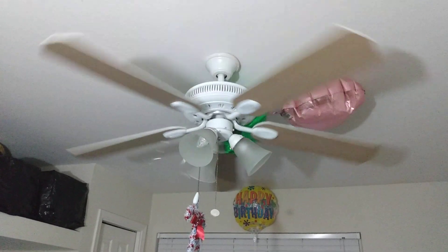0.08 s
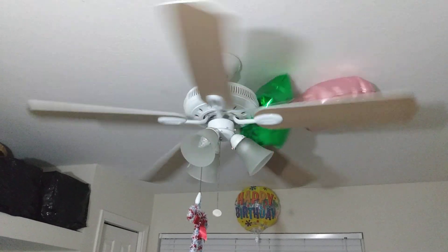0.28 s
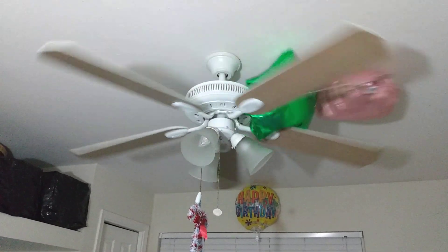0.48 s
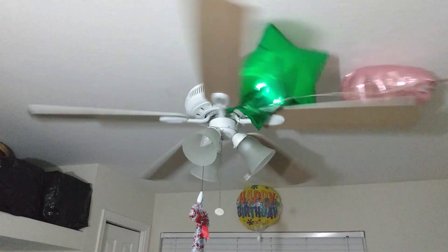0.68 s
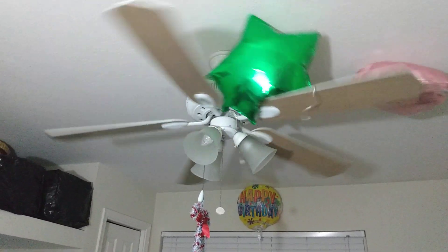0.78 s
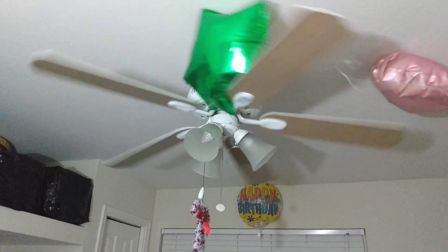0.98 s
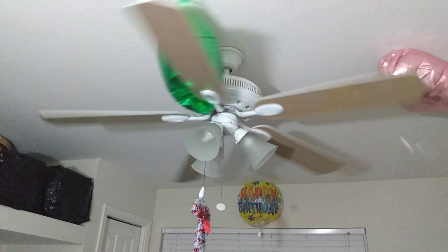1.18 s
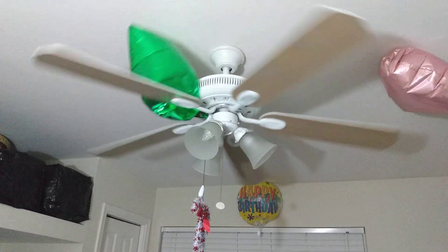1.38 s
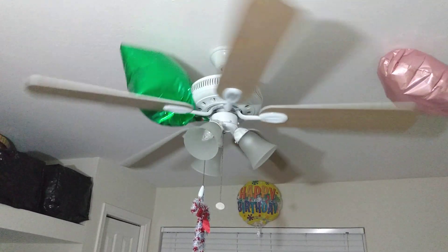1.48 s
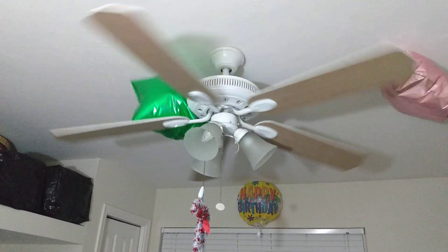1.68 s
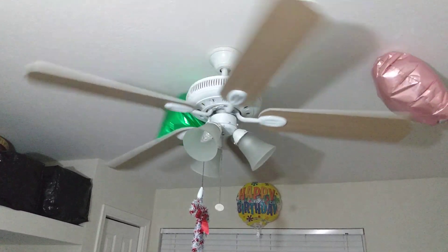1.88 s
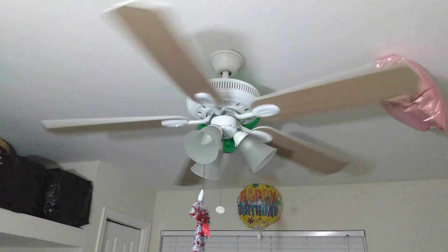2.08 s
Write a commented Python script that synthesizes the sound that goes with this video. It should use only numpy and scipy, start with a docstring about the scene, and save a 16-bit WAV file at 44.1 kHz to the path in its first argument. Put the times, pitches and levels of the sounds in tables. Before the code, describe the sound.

A foil balloon rustles very faintly, mostly to the right, over a quiet ceiling fan drone, with tiny early snaps. At about 0.2 s a blade catches it: sharp snaps, dense bright crinkling, rubbing and hollow bumps, strongest near 0.5-0.6 s, another crisp snap at 0.75 s. Crackling thins after 1.1 s and is gone by 1.4 s; small ticks at 1.65 and 1.97 s, with low wavering fan hum swelling around 1.7 and 2.0 s.

```python
"""A ceiling fan drones in a small room and a foil balloon rustles faintly, mostly to the right, throughout.
After a few early snaps a blade catches the balloon: clustered grains make the crinkle of the foil,
short noise bursts its snaps, filtered grains the rub of the skin, and noise and decaying sines the
boom of the gas inside. As this dies away, two small ticks sound and the fan's low drone of coloured
noise is joined by a wavering sine hum."""
import sys
import numpy as np
from scipy import signal
from scipy.fft import rfft, irfft
from scipy.io import wavfile

SR = 44100
rng = np.random.default_rng(int(sys.argv[2]) if len(sys.argv) > 2 else 0)


def file_out(sig):
    """Save sig as 16-bit WAV at sys.argv[1]."""
    # one column per channel
    cols = np.atleast_2d(sig).T
    # limit, then scale
    lim = np.clip(cols, -1, 1)
    pcm = np.round(lim * 32767).astype(np.int16)
    wavfile.write(sys.argv[1], SR, pcm)


N = 92610
TIME = np.arange(N) / SR  # s
FREQ = np.arange(N // 2 + 1) * SR / N  # Hz
SIDES = np.array([[1], [-1]])  # left, right

# Level curves [t/s, level/dB]; HOLLOWS later dips the fan, rustle and balloon layers
# drone of the fan
DRONE_LEVEL = [(0, -71), (.14, -70.5), (.185, -78.5), (.9, -74.5), (1.35, -71), (1.54, -77.5),
               (1.63, -70.5), (1.675, -70.5), (1.775, -64.5), (1.85, -73.5), (1.885, -74), (1.95, -76.5),
               (2.0, -73.5), (2.045, -66.5), (2.1, -77)]
# swish of the blades
SWISH_LEVEL = [(0, -85.5), (1.37, -79.5), (1.42, -70.5), (1.53, -73.5), (1.64, -83), (1.72, -93),
               (1.85, -99), (1.92, -87.5), (1.97, -85), (2.03, -79.5), (2.1, -86)]
# rustle of the drifting foil
RUSTLE_LEVEL = [(0, -59), (.19, -61.5), (1.2, -55.5), (1.36, -62), (1.5, -65.5), (1.63, -67.5),
                (1.72, -66.5), (1.85, -70.5), (1.91, -67.5), (1.96, -72), (2.04, -63.5), (2.1, -64)]
# soft brushing of the drifting balloon against the fan
BRUSH_LEVEL = [(0, -71.5), (.07, -80.5), (.136, -72), (.2, -79), (1.2, -72), (1.36, -74.5), (1.5, -80),
               (1.62, -81.5), (1.66, -76.5), (1.78, -74.5), (1.858, -88), (2.0, -86), (2.028, -70.5),
               (2.1, -71.5)]
# crinkle, set by how hard the foil is crumpled
CRUMPLE_LEVEL = [(.18, -100), (.208, -56), (.225, -57), (.233, -58), (.265, -43), (.29, -47), (.38, -47),
                 (.42, -45.5), (.465, -42.5), (.51, -38), (.553, -34.5), (.59, -35.5), (.64, -43),
                 (.69, -48), (.755, -45), (.87, -46), (1.0, -47.5), (1.08, -46.5), (1.17, -54.5),
                 (1.28, -67.5), (1.42, -110), (1.7, -100)]
# blade rubbing over the skin
RUB_LEVEL = [(.205, -105), (.212, -73), (.226, -66), (.245, -52.5), (.27, -54), (.36, -56.5), (.41, -51),
             (.45, -51.5), (.50, -47), (.585, -48.5), (.635, -49), (.69, -54.5), (.77, -51), (.92, -53.5),
             (1.06, -54.5), (1.17, -56), (1.33, -67), (1.42, -76.5), (1.52, -87.5), (1.7, -105)]
# body of the balloon being pushed about
PUSH_LEVEL = [(.212, -104), (.235, -66), (.30, -62.5), (.38, -73), (.44, -70), (.50, -55.5), (.56, -62),
              (.605, -58), (.658, -62), (.70, -63), (.78, -66), (.87, -61.5), (.96, -79), (1.07, -80),
              (1.18, -68.5), (1.33, -86), (1.5, -106)]
# low bass as the whole balloon sways
SWAY_LEVEL = [(.2, -105), (.25, -96), (.342, -88), (.38, -86), (.44, -71), (.54, -66.5), (.608, -58.5),
              (.658, -77), (.716, -79), (.79, -85), (.96, -89), (1.09, -100), (1.4, -115)]

# Relative spectra [f/Hz, level/dB]
# drone of the fan
FAN_SPECTRUM = [(25, -59), (65, -33), (150, -36), (220, -25), (270, -12.5), (310, -2), (340, -4.5),
                (362, -3), (392, -3), (470, -8.5), (540, -16.5), (620, -36), (750, -35.5), (840, -23),
                (960, -40), (2000, -37), (6000, -57)]
# air noise of the blades
BLADE_AIR_SPECTRUM = [(500, -40), (1000, -16), (1250, -19), (1380, 0), (1500, 1.5), (1680, -24),
                      (2050, -12.5), (2700, -17.5), (4000, -36)]
# loose foil stirring
LOOSE_FOIL_SPECTRUM = [(1000, -53), (2700, -25), (3400, -22.5), (4200, -16.5), (5000, -14), (6300, -15.5),
                       (7100, -11.5), (8900, -5.5), (10500, -4), (12500, -12.5), (15500, -12)]
# balloon brushing the fan
BRUSH_SPECTRUM = [(500, -22.5), (750, -34), (1100, -2.5), (1650, -11), (1950, 3.5), (2170, 1), (2370, 3.5),
                  (2520, -2), (2700, 2), (3050, -9.5), (3450, -10), (3700, 2), (3950, -7), (4220, 6.5),
                  (4650, -4.5), (5000, 0.5), (5450, -4), (6100, -18), (6700, -1), (9000, -27.5),
                  (15000, -27)]
# snapping creases
SNAP_SPECTRUM = [(1500, -43), (4000, -9), (6500, -5.5), (8500, 2), (10000, 2), (12000, -6.5), (15500, -10)]
# crumpled foil
FOIL_SPECTRUM = [(1200, -26), (2500, -10), (3150, -10.5), (3650, -6), (4100, -4.5), (4800, -6.5),
                 (6100, -6.5), (7400, -2), (8650, -1), (10200, -0.5), (12000, -3.5), (15500, -8)]
# rubbed skin
SKIN_SPECTRUM = [(50, -38), (120, -31), (200, -7), (295, -2), (420, -2), (630, -4.5), (760, -3.5),
                 (870, -3), (1020, -3.5), (1270, -5), (1500, -4), (1750, -6.5), (2400, -5.5), (2850, -12),
                 (3400, -14), (3900, -14), (6000, -10), (15000, -26)]
# body of the balloon
BODY_SPECTRUM = [(50, -30), (100, -13.5), (140, -7.5), (210, 1.5), (320, -6.5), (800, -61)]
# swaying of the whole balloon
SWAY_SPECTRUM = [(25, -28), (45, -17), (60, -16), (82, 6), (105, 7), (150, -34), (400, -70)]
# short scrape of the blade
GRAZE_SPECTRUM = [(150, -25), (300, 3.5), (650, 4.5), (1100, -19), (1500, -2), (1850, -11), (2350, 7.5),
                  (3300, -34), (4200, -5), (4800, -17), (5500, -12), (6500, -17), (15000, -28)]
# juddering skin under the hardest shove
SHOVE_SPECTRUM = [(60, -48), (150, -2), (230, -15), (350, 4.5), (480, 0.5), (630, 5), (750, -2),
                  (860, 10.5), (1000, -15), (1500, 0), (1800, -8), (5000, -48)]

# Stereo
# likeness of left and right [f/Hz, correlation]
LIKENESS = [(30, .82), (65, .92), (150, .95), (300, .9), (480, .7), (750, .25), (1500, .08), (4000, 0),
            (15000, 0)]
# balance of the nearer sounds [f/Hz, left minus right level/dB]
NEAR_BALANCE = [(100, 0), (300, .4), (700, .3), (1200, 0), (3000, 0), (5500, -3.6), (9000, -6.5),
                (15000, -2.2)]
# balance of rustle and swish, right in the treble [f/Hz, left minus right level/dB]
FAR_BALANCE = [(300, 31), (1500, -8), (4000, -5), (8000, -25.5), (15000, -9.5)]

# Events
# creases snapping over [t/s, level/dB before SNAP_DB and colouring, left minus right level/dB, decay/s]
SNAPS = [(.0438, -49, 8, .002), (0.1304, -43, -8, 0.0054), (.179, -53, -14, .002),
         (.2085, -45, -16, 0.0022), (0.2274, -29.5, -16, 0.0035), (0.235, -21.5, 0, 0.0026),
         (0.245, -20, -10, 0.0013), (.2486, -17, 1, 0.00059), (0.3, -29.5, -10, 0.0033),
         (0.472, -38, 1, .002), (.4983, -36, -8, .002), (0.508, -18, -2, 0.0025), (0.548, -21, 3, .003),
         (0.738, -23, -8, .003), (0.7511, -16, 0, 0.00086), (1.6527, -58, -28, 0.0034)]
# blade bumping the balloon, pitched by its squeeze [t/s, level/dB before BUMP_DB and fade, nominal f/Hz]
BUMPS = [(.207, -54.5, 334), (.258, -51, 356), (.451, -47.5, 493), (0.486, -53, 154), (.574, -40, 367.3),
         (.594, -46.5, 236), (.712, -50, 136), (.85, -57, 203), (.929, -51.5, 304), (1.035, -57, 376)]
# modes of the gas-filled skin [multiple of nominal f, level/dB]
BUMP_MODES = [(0.999, 0), (1.6, -22), (2.3, -17.5)]
# first graze of the blade (start t/s, end t/s, level/dB before HOLLOWS)
GRAZE = (0.209, 0.236, -60)
# taut panels of foil rasping [start t/s, end t/s, level/dB, f/Hz, half-width/Hz]
RASPS = [(0.28, .43, -62, 2620, 219), (0.48, 0.575, -55, 4270, 260), (.535, 0.58, -46, 8500, 700),
         (0.873, 1.19, -65.5, 1260, 170)]
# hardest shove of the blade (start t/s, end t/s, level/dB)
SHOVE = (0.57, 0.591, -46)
# small pitched ticks [t/s, level/dB before TICK_DB and fade, f/Hz, left minus right level/dB]
TICKS = [(1.648, -70, 3720, -3), (1.969, -57.5, 8060, -24)]
# hum joining the drone as the blades pass [start t/s, end t/s, nominal level/dB]
HUMS = [(1.668, 1.76, -65.5), (2.037, 2.032, -63.5)]
# fixed narrow dips filtered into the fan, rustle, balloon and graze layers [f/Hz, width/Hz, level/dB]
HOLLOWS = [(3064, 72, -5.5), (3450, 77, -17), (3900, 70, -5), (4800, 130, -3), (6280, 190, -1.5)]

# Settings; the spread scatters the grain levels exponentially
RUSTLES_PER_S, RUSTLE_SPREAD_DB = 4900, -0.5
CREASES_PER_S, CREASE_SPREAD_DB = 6000, -0.5
SLIPS_PER_S, SLIP_SPREAD_DB = 2200, 2
BRUSH_PATCHY_DB, BRUSH_PATCHY_HZ = 1.8, 18
CRINKLE_PATCHY_DB, CRINKLE_PATCHY_HZ = 1.5, 57
FLUTTER_DB, FLUTTER_HZ = -0.5, 78
ROOM_T60_S, ROOM_DB = 0.25, 1
SNAP_DB, SNAP_ROOM_DB = -6.5, -0.5
CAVITY_HZ, CAVITY_HALF_WIDTH_HZ, CAVITY_DB = 295, 26, -12.5  # level relative to RUB_LEVEL
BUMP_RISE_S, BUMP_DECAY_S, BUMP_DB, BUMP_ROOM_DB = 0.0035, 0.016, 2.5, -10.5
BUMP_LOW_CUT_HZ = 115
GRAZE_RISE_DB_PER_S, GRAZE_FALL_DB_PER_S = 2500, 600
RASP_RISE_DB_PER_S, RASP_FALL_DB_PER_S = 250, 81
SHOVE_RISE_DB_PER_S, SHOVE_FALL_DB_PER_S = 146, 262
TICK_RISE_S, TICK_DECAY_S, TICK_WIDTH_HZ, TICK_DB = 0.0022, 0.019, 550, -3.5
HUM_HZ, HUM_WANDER_HZ = 363, 8.95
HUM_RISE_DB_PER_S, HUM_FALL_DB_PER_S = 504, 158
CUTOFF_HZ = 15850


def from_db(db):
    """Logarithmic level: decibels to amplitude ratio."""
    return 10 ** (np.asarray(db) / 20)


def level(curve):
    """Amplitude envelope: gain interpolated in decibels over time."""
    return from_db(np.interp(TIME, *np.transpose(curve)))


def swell(start, end, db, rise_db_per_s, fall_db_per_s):
    """Exponential growth and decay: straight decibel slopes before start and after end."""
    before = np.maximum(start - TIME, 0)
    after = np.maximum(TIME - end, 0)
    return from_db(db - rise_db_per_s * before - fall_db_per_s * after)


def strike(start, rise_s, decay_s):
    """Struck resonance: a quick build-up followed by exponential decay."""
    age = np.maximum(TIME - start, 0)
    return (1 - np.exp(-age / rise_s)) * np.exp(-age / decay_s)


def wander(cutoff_hz):
    """Low-pass noise: a smooth random curve of standard deviation 1."""
    low_pass = signal.butter(2, np.clip(cutoff_hz, 2, 2000), fs=SR, output="sos")
    slow = signal.sosfilt(low_pass, rng.standard_normal(2 * N))[N:]  # skip the settling
    return slow / slow.std()


def noise_pair():
    """Statistical independence: unrelated white noise at the two ears."""
    return rng.standard_normal((2, N))


def at_bins(points):
    """Logarithmic frequency scale: a table read at every frequency bin."""
    hz, value = np.transpose(points)
    return np.interp(np.log(FREQ + 1), np.log(hz), value)


def unit(pair):
    """Normalisation: scale a pair so that its mid signal has rms 1."""
    return pair / np.sqrt(np.mean(pair.mean(0) ** 2) + 1e-20)


def place(pair, spectrum, balance):
    """Interaural correlation: colour two signals, blend them by band and set their balance."""
    a, b = rfft(pair) * from_db(at_bins(spectrum))
    alike = np.clip(at_bins(LIKENESS), -1, 1)
    common = np.sqrt(1 + alike) * (a + b)
    opposed = np.sqrt(1 - alike) * (a - b)
    lean = from_db(SIDES * at_bins(balance) / 2)
    return irfft((common + SIDES * opposed) / 2 * lean, N)


def room(pair, wet_db):
    """Reverberation: dense, dying reflections of ceiling and walls, different at each ear."""
    t = TIME[:N // 4]
    tail = rng.standard_normal((2, len(t))) * from_db(-60 * t / ROOM_T60_S)
    tail /= np.sqrt(np.sum(tail ** 2, axis=1, keepdims=True))
    return pair + from_db(wet_db) * signal.fftconvolve(pair, tail, axes=1)[:, :N]


def grains(per_s, spread_db):
    """Shot noise: one-sample clicks at random times and of random size, heard in the room."""
    born = rng.random(N) < per_s / SR
    sizes = from_db(spread_db * np.minimum(rng.exponential(1, N), 4))
    clicks = born * sizes * rng.uniform(-1.224, 1, (2, N))
    return room(clicks, ROOM_DB)


def patchy(pair, depth_db, cutoff_hz, count=14):
    """Independent modulation: overlapping bands flicker separately, so the colour keeps changing."""
    centres, spectrum, out = np.geomspace(700, 15000, count), rfft(pair), 0
    for share in np.eye(count):
        weight = at_bins(np.column_stack([centres, share]))
        band = irfft(spectrum * weight, N)
        out = out + band * from_db(depth_db * wander(cutoff_hz))
    return out


def hollowed(pair):
    """Band rejection: fixed narrow dips leave a sound banded and hollow."""
    dips = sum(db * np.exp(-((FREQ - centre_hz) / width_hz) ** 2) for centre_hz, width_hz, db in HOLLOWS)
    return irfft(rfft(pair) * from_db(dips), N)


def fan():
    """Aerodynamic noise: coloured noise gives a hollow drone and the thin swish of the blades."""
    drone = level(DRONE_LEVEL) * unit(place(noise_pair(), FAN_SPECTRUM, NEAR_BALANCE))
    swish = level(SWISH_LEVEL) * unit(place(noise_pair(), BLADE_AIR_SPECTRUM, FAR_BALANCE))
    return drone + swish


def rustle():
    """Superposed impulses: foil stirs in the draught and brushes lightly, mostly to the right."""
    stirs = grains(RUSTLES_PER_S, RUSTLE_SPREAD_DB)
    stir = level(RUSTLE_LEVEL) * unit(place(stirs, LOOSE_FOIL_SPECTRUM, FAR_BALANCE))
    touches = patchy(grains(per_s=2500, spread_db=-0.3), BRUSH_PATCHY_DB, BRUSH_PATCHY_HZ)
    brush = level(BRUSH_LEVEL) * unit(place(touches, BRUSH_SPECTRUM, FAR_BALANCE))
    return stir + brush


def snaps():
    """Snap-through buckling: large creases give way in bright, decaying noise bursts."""
    force = np.zeros((2, N))
    for start, db, pan_db, decay_s in SNAPS:
        age = TIME - start
        fade = (age >= 0) * np.exp(-np.abs(age) / decay_s)
        force += from_db(db + SNAP_DB + SIDES * pan_db / 2) * fade
    noise = rng.uniform(-0.82, 1, (2, N)) * np.sqrt(3)
    bursts = room(force * noise, SNAP_ROOM_DB)
    return irfft(rfft(bursts) * from_db(at_bins(SNAP_SPECTRUM)), N)


def crinkle():
    """Crackling noise: thousands of small creases flip while the blade crumples the foil."""
    flutter = from_db(FLUTTER_DB * wander(FLUTTER_HZ))
    flips = grains(CREASES_PER_S, CREASE_SPREAD_DB)
    creases = patchy(flips, CRINKLE_PATCHY_DB, CRINKLE_PATCHY_HZ)
    return level(CRUMPLE_LEVEL) * unit(flutter * place(creases, FOIL_SPECTRUM, NEAR_BALANCE))


def balloon():
    """Stick-slip friction: the skin rubs in grains; noise gives the boom and sway of the body."""
    slips = patchy(grains(SLIPS_PER_S, SLIP_SPREAD_DB), depth_db=1.5, cutoff_hz=53)
    skin = level(RUB_LEVEL) * unit(place(slips, SKIN_SPECTRUM, NEAR_BALANCE))
    body = level(PUSH_LEVEL) * unit(place(noise_pair(), BODY_SPECTRUM, NEAR_BALANCE))
    sway = level(SWAY_LEVEL) * unit(place(noise_pair(), SWAY_SPECTRUM, NEAR_BALANCE))
    return skin + body + sway


def cavity():
    """Cavity resonance: the gas sings as narrow-band noise whose level follows the rub."""
    resonance = 1 / (1 + ((FREQ - CAVITY_HZ) / CAVITY_HALF_WIDTH_HZ) ** 2)
    ring = irfft(rfft(rng.standard_normal(N)) * resonance, N)
    return level(RUB_LEVEL) * from_db(CAVITY_DB) * unit(np.array([ring, ring]))


def bumps():
    """Modal vibration: the blade's soft knocks ring the gas-filled body in decaying sines."""
    out = np.zeros(N)
    for start, db, pitch_hz in BUMPS:
        age = np.maximum(TIME - start, 0)
        fade = strike(start, BUMP_RISE_S, BUMP_DECAY_S)
        for ratio, mode_db in BUMP_MODES:
            mode = np.sin(2 * np.pi * pitch_hz * ratio * age)
            out += from_db(db + mode_db + BUMP_DB) * fade * mode
    high_pass = signal.butter(2, BUMP_LOW_CUT_HZ, "high", fs=SR, output="sos")
    out = signal.sosfilt(high_pass, out)
    return room(np.array([out, out]), BUMP_ROOM_DB)


def graze():
    """Sliding friction: the blade first scrapes the skin in a short run of coloured grains."""
    gain = swell(*GRAZE, GRAZE_RISE_DB_PER_S, GRAZE_FALL_DB_PER_S)
    slips = grains(SLIPS_PER_S, SLIP_SPREAD_DB)
    return gain * unit(place(slips, GRAZE_SPECTRUM, NEAR_BALANCE))


def rasps():
    """Forced resonance: as the balloon rolls, the slipping blade sets taut panels ringing."""
    out = 0
    for start, end, db, pitch_hz, half_width_hz in RASPS:
        slips = place(grains(per_s=1500, spread_db=1.4), SKIN_SPECTRUM, NEAR_BALANCE)
        resonance = 1 / (1 + ((FREQ - pitch_hz) / half_width_hz) ** 2)
        ring = irfft(rfft(slips) * resonance, N)
        out = out + swell(start, end, db, RASP_RISE_DB_PER_S, RASP_FALL_DB_PER_S) * unit(ring)
    return out


def shove():
    """Frictional judder: sparse grains make a hollow rumble where the blade pushes hardest."""
    gain = swell(*SHOVE, SHOVE_RISE_DB_PER_S, SHOVE_FALL_DB_PER_S)
    return gain * unit(place(grains(per_s=680, spread_db=3.5), SHOVE_SPECTRUM, NEAR_BALANCE))


def ticks():
    """Damped resonance: tight little creases ring briefly as narrow-band noise."""
    out = np.zeros((2, N))
    for start, db, pitch_hz, pan_db in TICKS:
        resonance = 1 / (1 + ((FREQ - pitch_hz) / TICK_WIDTH_HZ) ** 2) ** 2
        ring = irfft(rfft(noise_pair()) * resonance, N)
        fade = strike(start, TICK_RISE_S, TICK_DECAY_S)
        out += from_db(db + TICK_DB) * fade * unit(ring * from_db(SIDES * pan_db / 2))
    return out


def hum():
    """Frequency modulation: a low sine of the fan swells and fades with unsteady pitch."""
    pitch_hz = HUM_HZ + HUM_WANDER_HZ * wander(cutoff_hz=26.7)
    phase = 2 * np.pi * np.cumsum(pitch_hz) / SR
    gain = sum(swell(*row, HUM_RISE_DB_PER_S, HUM_FALL_DB_PER_S) for row in HUMS)
    return np.sqrt(2) * np.sin(phase) * gain  # sqrt(2) gives the sine rms 1


def scene():
    """Superposition: the sounds of fan and balloon add."""
    banded = hollowed(fan() + rustle() + balloon() + graze())
    foil = snaps() + crinkle() + rasps() + ticks()
    body = cavity() + bumps() + shove()
    return banded + foil + body + hum()


def record(dry):
    """Low-pass filtering: the top is cut steeply."""
    low_pass = signal.ellip(12, .1, 80, CUTOFF_HZ, fs=SR, output="sos")
    return signal.sosfilt(low_pass, dry)


dry = scene()
out = record(dry)
file_out(out)
```